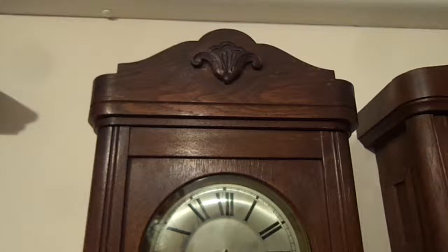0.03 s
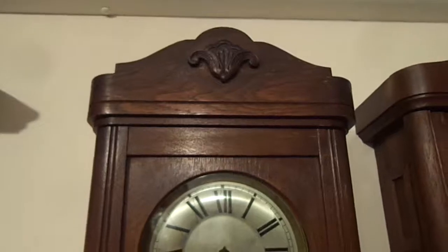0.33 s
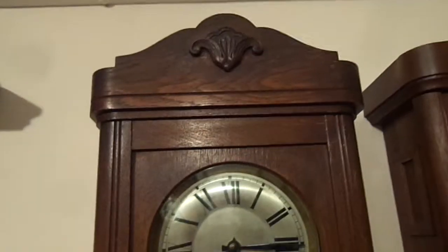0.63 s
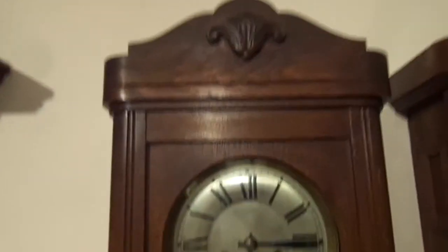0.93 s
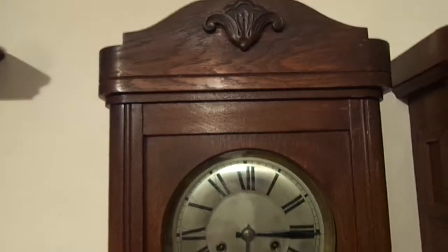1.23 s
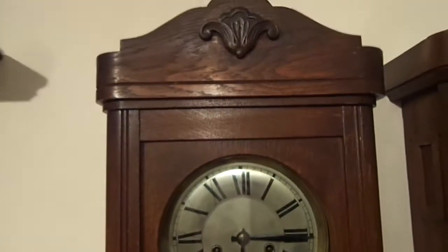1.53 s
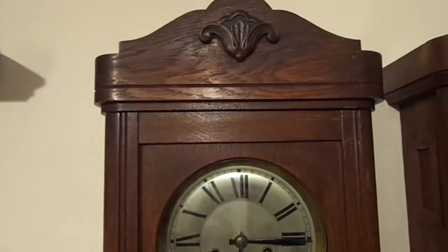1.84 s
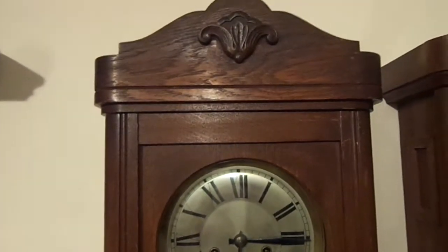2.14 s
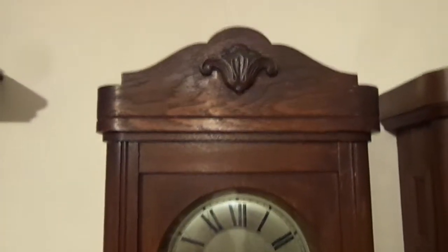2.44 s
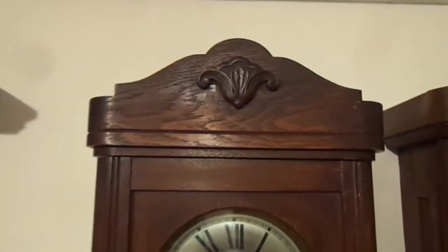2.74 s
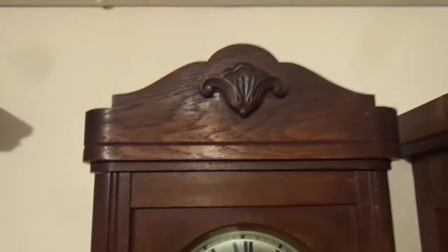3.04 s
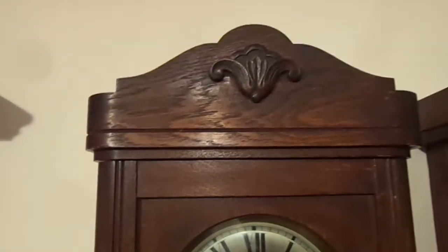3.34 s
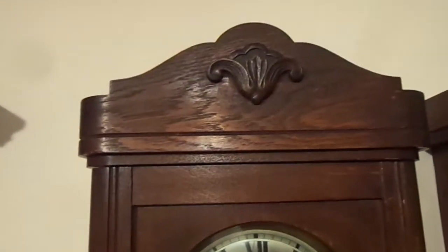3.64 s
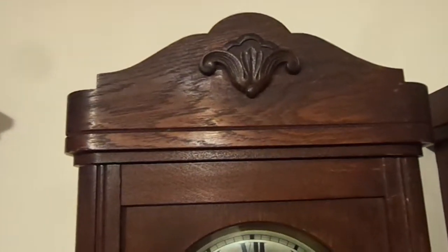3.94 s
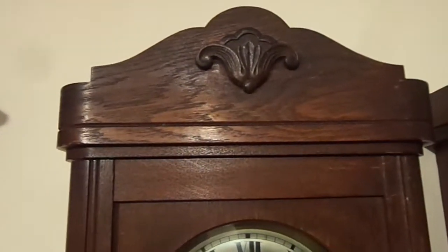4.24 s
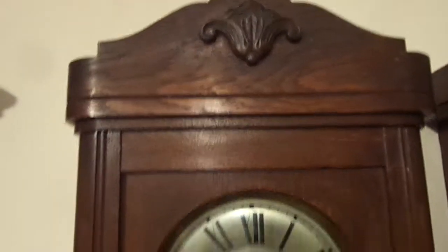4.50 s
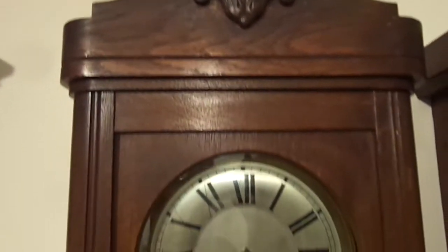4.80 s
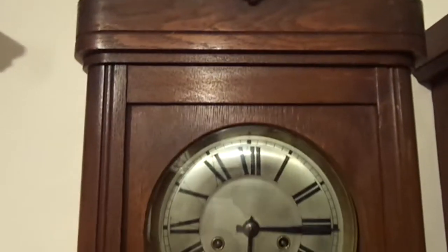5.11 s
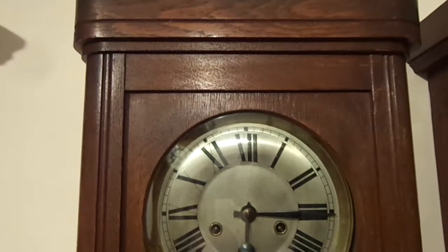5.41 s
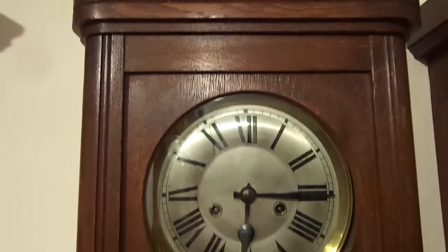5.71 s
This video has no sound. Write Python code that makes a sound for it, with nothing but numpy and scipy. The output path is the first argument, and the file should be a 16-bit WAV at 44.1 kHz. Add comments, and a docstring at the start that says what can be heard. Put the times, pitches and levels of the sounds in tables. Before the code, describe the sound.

Pendulum wall clocks tick softly and unevenly against each other in a quiet, hissy room, after a brief, much louder handling bump.

```python
"""Three ticking wall clocks

Three pendulum clocks tick out of step in a quiet room, one nearby and two farther off. On each beat
a gear tooth drops onto a catch, which rattles and rings the case. As the microphone opens, fingers
snap and knock against the camera body. Under it all lie room air, hiss and a thin electronic whine."""
import sys
import numpy as np
from scipy import signal
from scipy.fft import rfft, irfft
from scipy.io import wavfile

SR = 44100
rng = np.random.default_rng(int(sys.argv[2]) if len(sys.argv) > 2 else 0)


def master_out(mix):
    """Clip the mix to full scale and print it as 16-bit PCM to the path in sys.argv[1]."""
    frames = np.transpose(np.atleast_2d(mix))
    ceiling = np.clip(frames, -1, 1)
    pcm = np.round(ceiling * 32767).astype(np.int16)
    wavfile.write(sys.argv[1], SR, pcm)


N = 262836
TIME = np.arange(N) / SR
AGE = np.arange(SR // 3) / SR  # seconds since a blow


def gain_of(db):
    """Turns decibels (dB) into a factor to multiply a sound by."""
    return 10 ** (np.asarray(db) / 20)


def add(mix, start, sound):
    """Mixes a sound in at a start time in seconds."""
    part = mix[round(start * SR):][:len(sound)]
    part += sound[:len(part)]


def noise(spectrum, size):
    """Noise of average power 1, shaped by rows of frequency in Hz and level in dB."""
    hz, db = np.transpose(spectrum)
    shape_db = np.interp(np.log(np.fft.rfftfreq(size, 1 / SR) + 1), np.log(hz), db)
    shaped = irfft(rfft(rng.standard_normal(size)) * gain_of(shape_db), size)
    return shaped / np.sqrt(np.mean(shaped ** 2) + 1e-20)


def swell(rise):
    """A soft start: echoes inside a case pile up for `rise` seconds."""
    return np.sin(np.pi / 2 * np.minimum(AGE / rise, 1)) ** 2


def struck(modes, stretch=1):
    """One blow rings several tones. Each drops 60 dB in its fade time, multiplied by `stretch`."""
    hz, db, fade = np.transpose(modes)[:, :, None]
    return (gain_of(db - 60 * AGE / (fade * stretch)) * np.sin(2 * np.pi * hz * AGE)).sum(0)


# Room air and hiss. Each row: frequency in Hz, relative level in dB.
AIR_SPECTRUM = [(12, -23), (20, -2.5), (27, -16.5), (124, -6.5), (319, -6.5), (457, -4.5), (638, -5.5),
                (693, -5), (796, -6.5), (889, -6.5), (1830, -10.5), (2100, -12), (7510, -17),
                (12000, -16.5), (15000, -19.5)]
# The whine's drifting loudness. Each row: time in seconds, change in dB.
WHINE_DRIFT = [(.1, -2), (1.3, 1.5), (2.4, -1), (3.0, -9), (5.9, -7)]

def background():
    """Steady room air and microphone hiss, with a wavering whine from the camera's electronics."""
    whine_hz, waver_hz = 12288, 30
    waver = 0.9 * np.sin(2 * np.pi * (waver_hz * TIME + rng.random()))
    whine = np.sqrt(2) * np.sin(2 * np.pi * whine_hz * TIME + waver)
    whine_db = -74 + np.interp(TIME, *np.transpose(WHINE_DRIFT))
    return gain_of(-59) * noise(AIR_SPECTRUM, N) + gain_of(whine_db) * whine


# Finger snaps on the camera. Each row: start in seconds, relative level in dB, fade time multiplier.
SNAP_HITS = [(.1143, -12, .85), (0.1358, -12, 1.07), (0.173, -38, 1.3)]
# The shell's tones. Each row: pitch in Hz, relative level in dB, base fade time in seconds.
SHELL_TONES = [(4300, -7, .0035), (4800, 2.5, 0.0023), (7560, -6.5, 0.0038), (9200, -7.5, 0.0026),
               (10800, -10, 0.0022), (12800, -6, .0022)]

def shell_snaps():
    """Fingers make the camera's thin shell snap with a bright ring and a buzz."""
    out = np.zeros(N)
    bass_cut = signal.butter(4, 3450, "highpass", fs=SR)  # small parts give off little bass
    buzz_spectrum = [(800, -19.5), (2800, -11), (4200, -1), (6500, -7), (9000, -4), (15000, -6)]
    for start, db, stretch in SNAP_HITS:
        ring = signal.lfilter(*bass_cut, struck(SHELL_TONES, stretch))
        buzz = gain_of(-15.5 - 60 * AGE / (0.012 * stretch)) * noise(buzz_spectrum, len(AGE))
        add(out, start, gain_of(db) * (ring + buzz))
    return out


# The camera body's tones. Each row: pitch in Hz, relative level in dB, fade time in seconds.
BODY_TONES = [(330, -19, .014), (868, -0.5, 0.018), (1043, -18.5, 0.039), (1310, -12.5, 0.0077),
              (1876, -7.5, .017), (2540, -23, .014), (4300, -20, .006)]
# The knock's brief crack. Each row: frequency in Hz, relative level in dB.
CRACK_SPECTRUM = [(100, -16), (600, -5), (2500, -4), (4500, -2), (6000, -15), (9000, -18), (13000, -15),
                  (15000, -20)]

def body_knock():
    """One dull knock on the camera body echoes in the room and rebounds softly."""
    out = np.zeros(N)
    ring = struck(BODY_TONES) * swell(rise=0.00029)
    crack = gain_of(-11.5 - 60 * AGE / 0.012) * noise(CRACK_SPECTRUM, len(AGE))
    knock = signal.lfilter(*signal.butter(1, 560, "highpass", fs=SR), ring + crack)
    echo = noise([(100, 5), (900, -2), (2500, -10), (6000, -22), (15000, -35)], len(AGE))
    echo *= gain_of(-39 - 60 * AGE / 0.18)
    rebound = gain_of(-18) * signal.lfilter(*signal.butter(1, 1000, "lowpass", fs=SR), knock)
    add(out, start=0.1819, sound=knock + echo)
    add(out, start=0.2188, sound=rebound)
    return gain_of(-9) * out


def beats(pendulum):
    """Each full swing gives a tick and, a little past halfway, a tock."""
    first, period, tock_after, tick_db, tock_db = pendulum
    rows = []
    for tick in first + period * np.arange(-1, N / SR / period):
        rows += [(tick, tick_db, False), (tick + tock_after, tock_db, True)]
    return [(start, db, is_tock) for start, db, is_tock in rows if 0 <= start < N / SR]


def clatter(spectrum, rise, hold, fade, room_db, room_fade=0.53):
    """A tooth hits a catch: the case rattles, then the room echoes faintly. Times are in seconds."""
    direct = gain_of(-60 * np.maximum(AGE - hold, 0) / fade)
    room = gain_of(room_db - 60 * AGE / room_fade)
    return noise(spectrum, len(AGE)) * swell(rise) * np.hypot(direct, room)


def clock(pendulum, tones, spectrum, ring_db, rattle_db, rise, hold, fade, room_db):
    """Two catches take turns ringing the same case, a little differently on each beat."""
    out = np.zeros(N)
    hz, tick_db, tock_db, tone_fade = np.transpose(tones)[:, :, None]
    for start, db, is_tock in beats(pendulum):
        tone_db = (tock_db if is_tock else tick_db) + rng.standard_normal(hz.shape)
        levels = gain_of(tone_db - 60 * (AGE - rise / 2) / tone_fade)
        waves = np.sin(2 * np.pi * (hz * AGE + rng.random(hz.shape)))
        ring = gain_of(ring_db) * (levels * waves).sum(0) * swell(rise)
        rattle = gain_of(rattle_db) * clatter(spectrum, rise, hold, fade, room_db)
        add(out, start, gain_of(db) * (ring + rattle))
    return out


# The far pendulums. Each holds: first tick, full swing and tick-to-tock gap in seconds,
# then relative tick and tock levels in dB.
QUICK_SWING = (1.021, 1.172, .619, -52.5, -56.5)
SLOW_SWING = (.214, 1.480, .816, -55.5, -55)
# Their cases' tones. Each row: pitch in Hz, relative tick and tock levels in dB, fade time in seconds.
QUICK_TONES = [(943, -1, -5, .11), (1063, -3, -6, 0.13), (1260, -18, 2, 0.12), (1740, 0, -0.5, .11),
               (1783, -3, -3, 0.12), (1916, -9, -1, .09), (2130, -4, -14, 0.094), (2350, -14, -11, .08),
               (2594, -2.5, -8, .1), (3740, -9, -8, .09), (9200, -12, -18, .08)]
SLOW_TONES = [(710, 0, -4.5, 0.19), (1165, -10, -7, 0.11), (1293, -12, -3.5, 0.11), (1820, -10, -3, .1),
              (2050, -14, -6, 0.088), (2160, -2, -6, .1), (2310, -1, -21, .1), (2760, -9, -5, .08),
              (3260, -15, -9, .07), (3250, -7, -9, .08), (3980, -4.5, -16, 0.11)]
# Their rattle. Each row: frequency in Hz, relative level in dB.
FAR_RATTLE = [(300, -19), (650, -4), (1200, 1), (1500, -5), (1800, 0), (2300, 0.5), (3300, -8),
              (4500, -13.5), (7000, -15), (14000, -17)]

def far_clocks():
    """Two far clocks arrive dull and smeared by echoes. The longer pendulum swings more slowly."""
    shared = dict(spectrum=FAR_RATTLE, ring_db=-3.5, rattle_db=-5, room_db=-5.5)
    quick = clock(QUICK_SWING, QUICK_TONES, rise=0.012, hold=0.022, fade=0.15, **shared)
    slow = clock(SLOW_SWING, SLOW_TONES, rise=0.0065, hold=0.016, fade=0.16, **shared)
    return quick + slow


# The near pendulum: first tick, full swing and tick-to-tock gap in seconds,
# then relative tick and tock levels in dB.
NEAR_SWING = (.673, 1.1798, .607, -49.5, -51.5)
# Its case and gears. Each row: pitch in Hz, relative tick and tock levels in dB, fade time in seconds.
NEAR_TONES = [(801, -2.5, -1.5, 0.15), (1202, -12, -7, 0.11), (1519, -2, -2.5, 0.071),
              (1557, 1, -1.5, 0.083), (2115, -7, -4, 0.073), (2330, -8, -16, 0.051), (2940, -18, -7.5, .07),
              (3430, -6, -15, 0.095), (5330, -12, -7.5, 0.038), (6700, -7, -16, 0.032)]
# Its rattle. Each row: frequency in Hz, relative level in dB.
NEAR_RATTLE = [(300, -11), (700, -3), (1250, 1), (1800, -0.5), (2200, 0), (3000, -7.5), (4200, -10),
               (6800, -10), (9000, -15), (15000, -20)]
# It is fainter while the camera points above its dial. Each row: time in seconds, change in dB.
NEAR_DIP = [(1.8, 0), (3.1, -3.3), (5.4, -.5)]

def near_clock():
    """Close by, bright steel clicks just before the wood answers; then the gear kicks back."""
    out = clock(NEAR_SWING, NEAR_TONES, NEAR_RATTLE, ring_db=-0.5, rattle_db=-6,
                rise=0.0095, hold=0.01, fade=0.082, room_db=-7.5)
    for start, db, is_tock in beats(NEAR_SWING):
        steel = noise([(2500, -24), (5200, -4), (7000, 6), (9000, -5), (15000, -13)], len(AGE))
        add(out, start, gain_of(db - 8 - 60 * AGE / 0.04) * steel * swell(rise=0.002))
        kick = clatter(NEAR_RATTLE, rise=0.0062, hold=0.0059, fade=0.1, room_db=-10, room_fade=0.3)
        kick_delay = 0.051 if is_tock else 0.075
        add(out, start + kick_delay, gain_of(db - 14) * kick)
    return out * gain_of(np.interp(TIME, *np.transpose(NEAR_DIP)))


def scene():
    """One microphone feeds the same sound to left and right."""
    mono = near_clock() + far_clocks() + shell_snaps() + body_knock() + background()
    return np.array([mono, mono])


# The microphone opening. Each row: time in seconds, gain in dB.
MIC_FADE_IN = [(0, -60), (0.071, -46), (.08, -13), (.091, -12), (0.095, -0.5)]

def record(dry):
    """The microphone opens quickly, and the highest treble is cut away."""
    opened = dry * gain_of(np.interp(TIME, *np.transpose(MIC_FADE_IN)))
    treble_cut = signal.firwin(511, cutoff=15150, window=("kaiser", 9), fs=SR)
    return signal.oaconvolve(opened, treble_cut[None], "same")


dry = scene()
out = record(dry)
master_out(out)
```